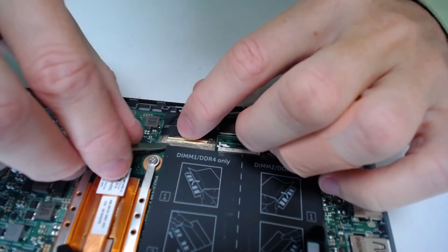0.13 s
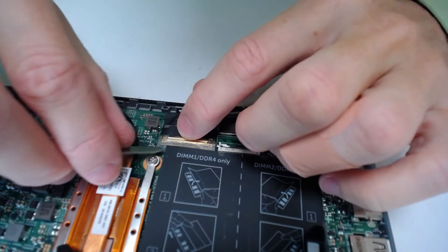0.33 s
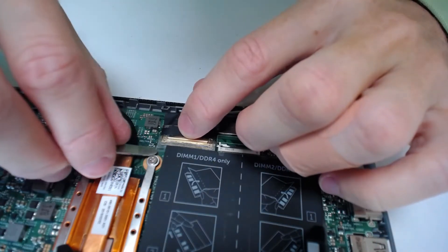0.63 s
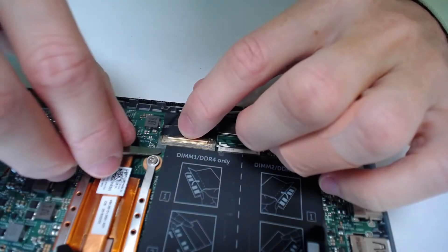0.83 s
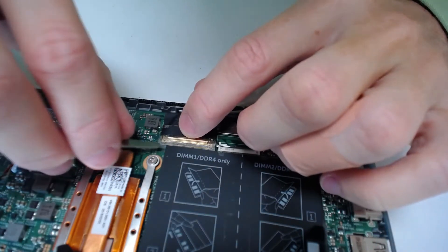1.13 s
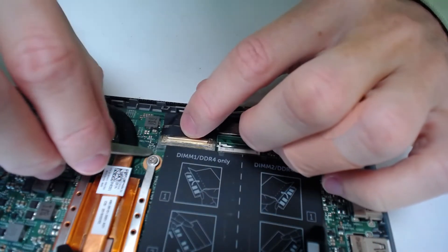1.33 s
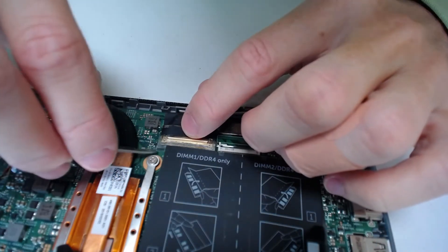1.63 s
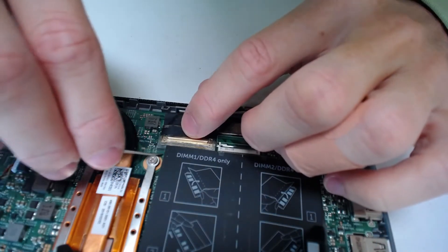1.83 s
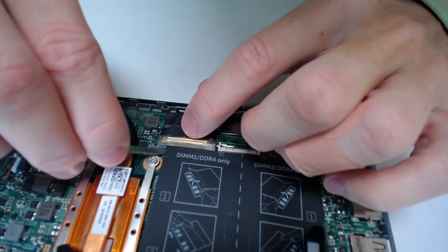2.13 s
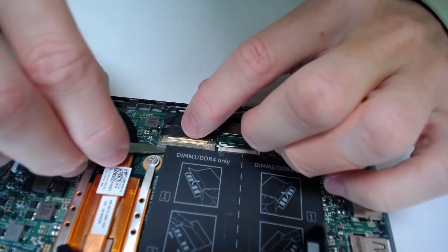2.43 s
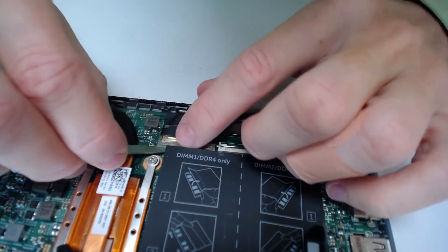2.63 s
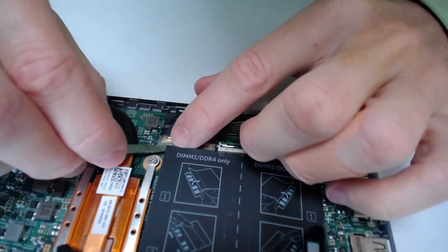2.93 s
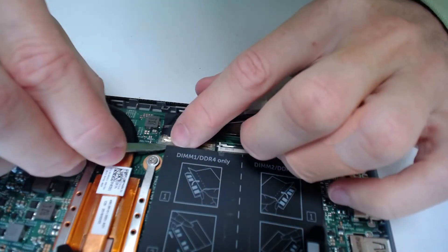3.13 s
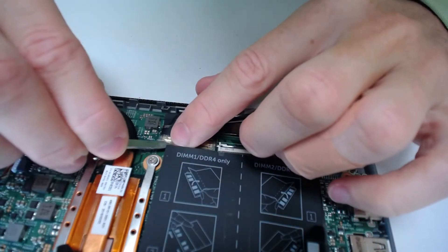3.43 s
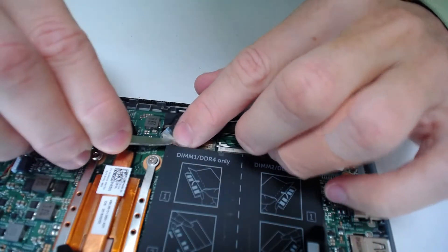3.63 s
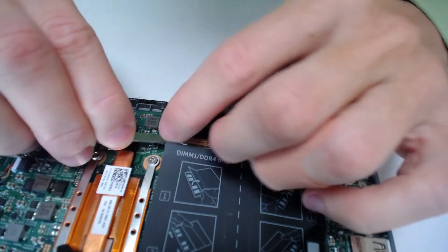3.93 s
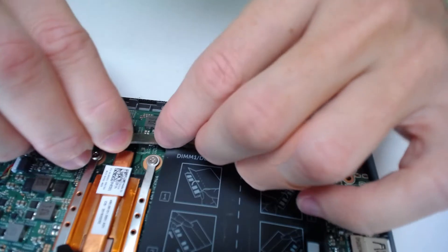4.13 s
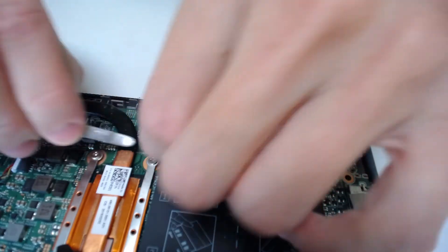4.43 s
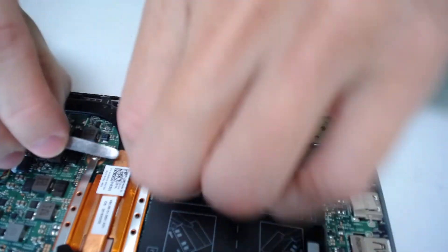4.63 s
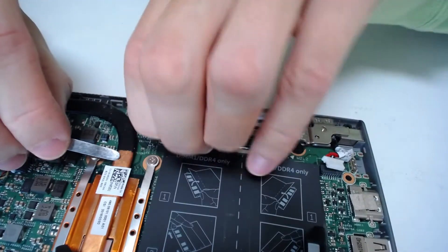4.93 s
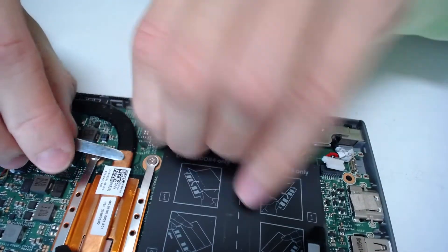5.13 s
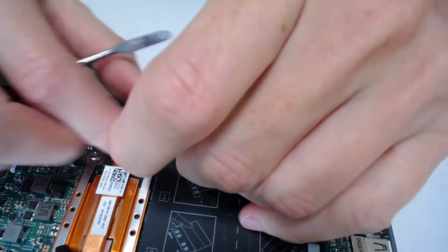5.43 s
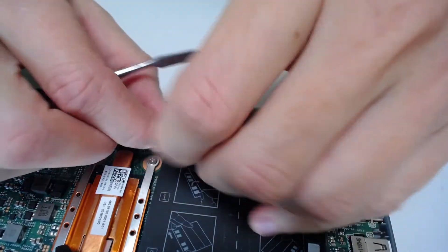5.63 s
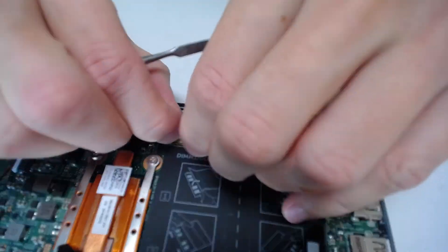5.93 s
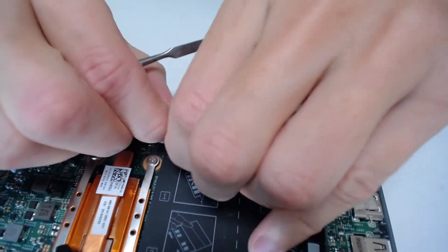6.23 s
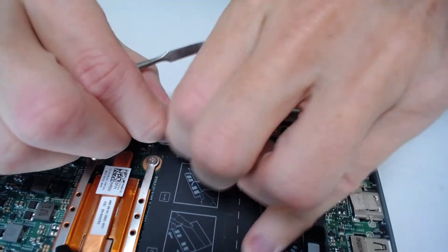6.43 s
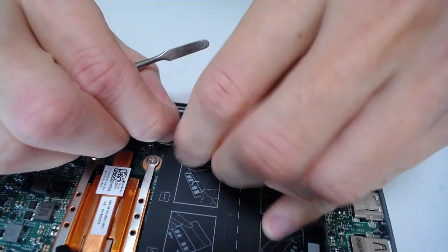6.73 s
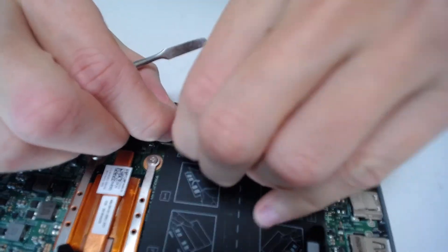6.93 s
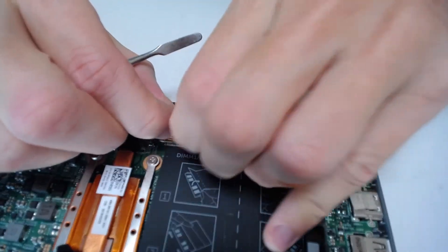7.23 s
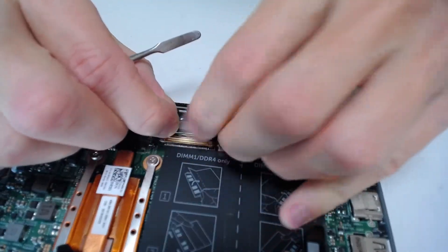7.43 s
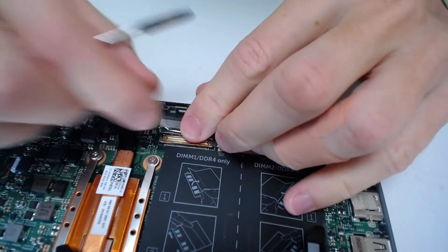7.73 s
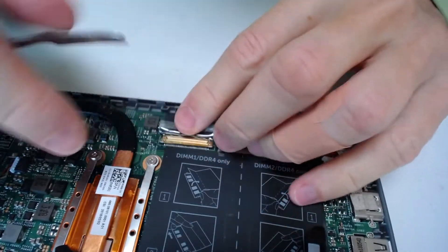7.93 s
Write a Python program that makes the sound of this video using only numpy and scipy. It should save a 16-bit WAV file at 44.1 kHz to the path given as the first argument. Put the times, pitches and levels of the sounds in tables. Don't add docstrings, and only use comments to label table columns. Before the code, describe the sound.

Throughout, a distant motor hums low and steady with a slight sway, beneath soft draught rumble and thin microphone hiss. Close up, fingers brush a circuit board: barely audible rubs and a faint tap by 0.9 s, a double light tick at 1.3, a soft knock at 2.1, a small crackle at 2.6. At 3.5 a steel blade slips with a crisp click, followed by ticks and peeling tape to about 4. Crackles return at 4.7-4.8, then a cluster at 5.1 with a dull, ringing bump. Rustles and squeaky rubs continue, with clicks near 6.05 and 6.2. From 6.3 to 6.65 knocks and scrapes crowd together, with tape letting go hard at 6.6. At 7.05 a ribbon cable snaps, brightest and loudest, its short tail dying in a small hard room; a tap follows at 7.13. Tiny foil ticks come at 7.5-7.6, then faint handling until 8.1.

```python
import sys
import numpy as np
from scipy import signal
from scipy.fft import rfft, irfft, next_fast_len
from scipy.io import wavfile
from scipy.ndimage import uniform_filter1d

SR = 44100
rng = np.random.default_rng(int(sys.argv[2]) if len(sys.argv) > 2 else 0)


def generate_wav(sig):
    pcm = np.round(np.clip(np.atleast_2d(sig).T, -1, 1) * 32767).astype(np.int16)
    wavfile.write(sys.argv[1], SR, pcm)


def ratio_of_db(decibels):
    return 10 ** (np.asarray(decibels, float) / 20)


N = 356724

# f/Hz, width/Hz
BOARD = [(2250, 460), (4150, 850), (6600, 1600), (9000, 2000), (12500, 3000)]


def band(x, hz, width):
    b, a = signal.iirpeak(hz, hz / (1.296 * width), SR)
    return signal.lfilter(b, a, signal.lfilter(b, a, x))


def unit(x):
    return x / np.sqrt(np.mean(x ** 2))


def along(table, hz):
    points, value = np.transpose(table)
    return np.interp(np.log(hz + 1e-9), np.log(points), value)


def course(table, **ends):
    return np.interp(np.arange(N) / SR, *np.transpose(table), **ends)


def walk(rate):
    hold = int(SR / rate)
    steps = np.repeat(rng.standard_normal(N // hold + 1), hold)
    slewed = uniform_filter1d(uniform_filter1d(steps, hold), hold)
    return unit(slewed[:N])


def spread(mid, side):
    return np.array([mid + side, mid - side])


def add(out, x, s):
    part = out[int(s * SR):][:len(x)]
    part += x[:len(part)]


def steady_noise(colour, db, side_db):
    size = next_fast_len(N)
    hz = np.fft.rfftfreq(size, 1 / SR)
    mid, side = rfft(rng.standard_normal((2, size))) * ratio_of_db(along(colour, hz))
    mid, side = irfft([mid, side * ratio_of_db(along(side_db, hz))], size)[:, :N]
    return ratio_of_db(db) / mid.std() * spread(mid, side)


def hiss():
    # f/Hz, level/dB per Hz
    hiss_colour = [(1060, -31), (1800, -1), (2260, -3), (2460, -5), (2950, -5), (3950, -8), (6180, -10.5),
                   (9330, -8.5), (10600, -11.5), (15600, -12), (15750, -40)]
    # f/Hz, side minus mid/dB
    hiss_side = [(2000, 3), (6000, 0.5), (9000, -9), (15000, -11)]
    return steady_noise(hiss_colour, -84, hiss_side)


def draught():
    # f/Hz, level/dB per Hz
    air_colour = [(11, -38), (18, -8), (59, -2.5), (164, -13.5), (266, -11), (326, -10), (449, -16.5),
                  (584, -19.5), (789, -19.5), (855, -24), (945, -24.5), (1250, -28), (1410, -23.5),
                  (1560, -31), (2200, -54.5), (2860, -77), (4840, -120)]
    # f/Hz, side minus mid/dB
    air_side = [(25, -28), (60, -19), (110, -16.5), (250, -16.5), (700, -7), (1300, -0.5), (2200, -1)]
    # t/s, level/dB
    strength = [(0, -1), (1.2, -1), (2.5, -.8), (3.4, .3), (4.2, 1.5), (5.5, .8), (6.6, .3), (8.09, 0)]
    gusts = course(strength) + .6 * walk(0.98)
    return steady_noise(air_colour, -66.5, air_side) * ratio_of_db(gusts)


def hum():
    # f/Hz, level/dB
    lines = [(59.2, -72), (118.4, -90), (172.3, -82.5), (204.6, -77), (231.5, -80), (274.5, -83),
             (323.0, -65), (398.4, -80), (500.6, -86.5), (667.5, -87), (786.0, -88.5), (942.1, -87),
             (1163, -92), (1378, -88.5), (1437, -91.5), (1453, -89)]
    # f/Hz, side minus mid/dB
    line_side = [(59, -24.5), (330, -24.5), (800, -13), (1450, -4)]
    # f/Hz, level/dB
    mains = [(120.3, -71.5), (120.54, -77.5)]
    t, out = np.arange(N) / SR, 0
    sway = np.cumsum(walk(1.501)) / SR
    for hz, db in lines:
        phase = 2 * np.pi * (hz * (t + 0.001505 * sway) + rng.random())
        tone = np.sqrt(2) * ratio_of_db(db) * (1 + .08 * walk(5)) * np.sin(phase)
        quarter_late = np.roll(tone, int(SR / hz / 4))
        out = out + spread(tone, ratio_of_db(along(line_side, hz)) * quarter_late)
    for hz, db in mains:
        phase = 2 * np.pi * hz * (t - 6.2)
        out = out + np.sqrt(2) * ratio_of_db(db) * spread(np.cos(phase), .15 * np.sin(phase))
    return out


def room(sharp, soft):
    # delay/s, level/dB, share to the left (-1..1)
    echoes = [(.0032, -19, -.3), (.0052, -20.5, 1), (0.0105, -31, -.5), (0.0219, -34, 0.64)]
    # f/Hz, T60/s
    decay = [(350, .45), (1500, 0.55), (4000, 0.74), (8000, 0.5), (13000, .25)]
    # f/Hz, level/dB
    tail_level = [(350, -14.5), (1000, -14.5), (2000, -21.5), (4000, -24.5), (7000, -23.5), (13000, -33)]
    # t/s, left minus right/dB
    place = [(0, 0), (1.3, 0), (3.47, -1), (4.5, 0), (5.1, -.7), (6.35, -1.2), (6.6, 0), (7.05, .3),
             (8.09, -.3)]
    x = sharp + soft
    side = 0.15 * (np.roll(x, 1) - np.roll(x, -1))
    side += .48 * band(x, 1250, 500) + .2 * band(x, 2300, 900) - .2 * band(x, 4500, 1500)
    lean = course(place) / 2
    out = spread(x, side) * ratio_of_db(np.array([lean, -lean]))
    for delay, db, left in echoes:
        out += ratio_of_db(db) * np.outer([1 + left, 1 - left], np.roll(sharp, int(delay * SR)))
    for hz in 400 * 2 ** np.arange(0, 5.3, 2 / 3):
        keep = ratio_of_db(-120 / along(decay, hz) / SR)
        late = np.roll(band(x, hz, .5 * hz), 260)
        energy = signal.lfilter([1 - keep], [1, -keep], late ** 2)
        envelope = np.sqrt(uniform_filter1d(energy, 132).clip(0))
        mid, side = unit(band(rng.standard_normal((2, N)), hz, .5 * hz))
        out += ratio_of_db(along(tail_level, hz) + 1.5 * walk(22)) * envelope * spread(mid, .8 * side)
    return out


def touches(*groups):
    centre = np.array(BOARD)[:, 0]
    rows = []
    for (pivot_hz, colour), events in groups:
        for s, span, db, tilt in events:
            rows.append((s, span, *(db + colour + tilt * np.log2(centre / pivot_hz))))
    return rows


def stroke(grains, s, length, hz, width, db):
    rise, fall = 0.0022 + 0.15 * length, .003 + 0.33 * length
    t = np.arange(int((length + rise + fall / 2) * SR)) / SR
    start = max(int((s - rise) * SR), 0)
    ring = band(grains[start:][:len(t)], hz, width)
    shape = np.clip(np.minimum(t / rise / 2, (t[-1] - t) / fall), 0, 1)
    return ratio_of_db(db) * shape[:len(ring)] * unit(ring), start / SR


def scuffs():
    skin_touch = 2340, (-0.5, -2.5, -9.5, -14, -33)
    tape_touch = 6300, (-5.5, -2, 0.5, -4, -25)
    # t/s, length/s, level/dB, tilt/dB per octave
    rubs = [(.02, 0.11, -87, -2.5), (.251, .094, -84, -1), (.51, .05, -90, 0), (.74, .076, -84, 1),
            (0.863, .035, -81, 0), (.93, .06, -87, -3), (1.312, .046, -69, -4), (2.073, 0.034, -75.5, -4),
            (4.392, 0.18, -82, 0), (4.935, .051, -78.5, 1), (5.319, .022, -79, 1), (5.43, .05, -76, 4),
            (5.481, 0.028, -64.5, 2), (5.901, 0.058, -75, 1.5), (5.97, 0.072, -76, 0),
            (6.3, .03, -69.5, 3.5), (6.34, .017, -70.5, 5), (6.369, .032, -59, -1),
            (6.401, .011, -53.5, -0.5), (6.414, 0.021, -62, 1.5), (6.51, .0084, -66, -4),
            (6.522, 0.026, -48, -7.5), (6.546, .014, -50.5, 0), (6.56, 0.045, -63.5, 0.5),
            (6.604, 0.012, -46.5, -1), (6.618, .011, -49, 1), (6.623, 0.072, -58.5, 1),
            (6.695, 0.056, -64, 2), (6.75, 0.066, -79, -1.5), (6.82, .078, -76, 3)]
    # t/s, length/s, level/dB, tilt/dB per octave
    peels = [(2.521, 0.068, -86.5, -3.5), (2.583, .088, -89, -3), (3.668, 0.075, -82, 0),
             (3.767, 0.09, -77, -2.5), (3.873, .21, -86, -4), (4.028, 0.17, -82, 2), (4.2, .06, -80, 3),
             (4.28, .11, -83, 2), (4.643, 0.059, -82, -4), (4.727, .031, -71, 2), (4.785, .023, -78, 2),
             (4.835, .077, -83, -5), (5.078, 0.06, -65, 0), (5.142, .067, -77.5, -4.5),
             (5.22, .064, -88, -4), (5.33, 0.021, -70.5, 6), (5.522, 0.03, -66.5, 1),
             (5.587, 0.042, -76, 0), (5.63, 0.043, -65.5, 2), (5.68, 0.054, -78.5, -2),
             (5.789, 0.061, -80.5, -3), (6.056, .11, -70.5, 4), (6.206, .037, -72.5, 2),
             (6.273, .017, -65, -5.5), (6.435, 0.044, -79, -1), (6.927, 0.12, -82.5, 0),
             (7.492, 0.013, -63, -4), (7.507, .03, -76, 3), (7.557, 0.038, -70, -1), (7.617, 0.02, -67, -1),
             (7.65, .1, -85, 0), (7.791, 0.05, -79.5, -1), (7.935, 0.077, -74.5, 1)]
    # t/s, length/s, f/Hz, level/dB
    squeaks = [(.05, .06, 2600, -87), (.261, 0.098, 4130, -76.5), (.28, .06, 2900, -81),
               (1.312, 0.046, 2300, -69), (2.08, .027, 2270, -69), (3.78, 0.075, 6350, -75),
               (4.94, .045, 4600, -77), (5.143, .11, 2760, -80), (5.32, 0.034, 4620, -73),
               (5.48, .03, 2200, -70), (5.51, .07, 4400, -73), (5.59, 0.09, 6200, -67.5),
               (5.7, .03, 6300, -75), (6.057, .12, 6270, -69), (6.63, .16, 1925, -66),
               (6.83, 0.073, 2320, -75.5), (6.94, 0.058, 6640, -80), (7.562, 0.05, 7500, -69),
               (7.62, .035, 7800, -69), (7.618, .02, 2200, -68), (0, 3.3, 9400, -100),
               (7.565, .03, 4300, -74), (7.975, 0.034, 2300, -74)]
    # t/s, length/s, f/Hz, level/dB
    swishes = [(8.03, 0.047, 6000, -79), (4.93, .06, 6000, -82), (5.14, .02, 9000, -75),
               (5.17, .04, 4900, -78), (5.705, .02, 11000, -82), (1.312, 0.049, 5000, -71),
               (3.485, .1, 5000, -76), (7.56, .055, 8000, -68), (6.68, .055, 9300, -67),
               (3.495, .13, 8400, -76), (5.33, .015, 11000, -70), (6.622, .06, 8800, -60)]
    # t/s, length/s, f/Hz, level/dB
    drags = [
        (5.099, .025, 1100, -65.5),
        (6.28, 0.18, 700, -75),
        (6.3, 0.22, 550, -76),
        (6.38, .14, 40, -65.5),
        (7.5, 0.15, 550, -75),
        (7.054, .03, 130, -66),
        (7.085, .012, 280, -62),
    ]
    # t/s, level/dB
    hands = [(3.3, -85), (3.46, -84), (3.62, -80), (4.07, -76), (4.51, -81.5), (4.83, -78.5), (5.42, -80),
             (5.57, -75), (5.93, -76), (6.13, -72.5), (6.26, -76), (6.37, -73), (6.53, -65), (6.65, -70),
             (6.87, -75.5), (7.25, -72), (7.74, -77), (8.09, -78)]
    out, fits = np.zeros(N), ratio_of_db(2.6 * walk(130))
    grains = []
    for mode in BOARD:
        size_db = 2.5 * rng.exponential(size=N) + 1.4 * walk(40)
        grains.append(rng.standard_normal(N) * ratio_of_db(size_db) * fits)
    rows = touches((skin_touch, np.array(rubs)), (tape_touch, np.array(peels)))
    spots = 1 + 0.032 * rng.standard_normal((len(rows), len(BOARD)))
    for (s, length, *db), spot in zip(rows, spots):
        for (hz, width), d, k, grain in zip(BOARD, db, spot, grains):
            add(out, *stroke(grain, s, length, hz * k, width * (.9 + 4.6 * length), d))
    steady = rng.standard_normal(N) * ratio_of_db(1.2 * walk(60))
    for wide, slides in (.065, squeaks), (.23, swishes), (.58, drags):
        for s, length, hz, db in slides:
            add(out, *stroke(steady, s, length, hz, wide * hz, db))
    skin = unit(band(grains[1][::-1], 2600, 1820)) + 0.74 * unit(band(grains[2][::-1], 6000, 4500))
    return out + ratio_of_db(course(hands, left=-120) - 6.5 + 1.4 * walk(8)) * skin


def contact(ms, modes, slips, crack=0.):
    n = np.arange(len(slips))
    t = n / SR * 1000 / max(ms, .1)
    scatter = np.minimum(t, 1) * ratio_of_db(-16 - 60 * n / SR / 0.023)
    push = t * np.exp(1 - 1.61 * t) + scatter
    first = crack * np.linalg.norm(push) * (n == int(ms * SR / 2000))
    out = 0
    for k, (hz, width, db) in enumerate(modes):
        ring = band(push * np.roll(slips, 97 * k) + (-1) ** k * first, hz, width)
        out = out + ratio_of_db(db) * ring / np.abs(ring).max()
    return out


def ticks():
    knock_touch = 2400, (-0.5, -7, -14.5, -26, -36)
    blade_touch = 4040, (-12.5, 0, -13, -19, -30)
    crackle_touch = 6600, (-14.5, -5, 1, -4.5, -19)
    # t/s, contact/ms, peak level/dB, tilt/dB per octave
    knocks = [(6.273, 1.2, -52, 3), (6.512, 1.2, -55, 0), (6.5212, 1.5, -42, -6), (6.535, 1.5, -40, -4),
              (6.55, 2, -39, -6), (6.606, 1.5, -41, -2), (6.6122, 1.8, -31, -3), (5.068, 1.5, -62, 4),
              (1.719, 2.4, -67.5, -10), (2.087, 2.4, -52, -3.5), (2.395, 1.1, -69, 8),
              (5.712, 1.1, -61, 10), (5.938, 2.8, -48, -1.5), (6.4065, 1.6, -37.5, 3),
              (6.4115, 2.4, -38, -6), (6.5255, 2.2, -35, -8), (6.5415, 2.2, -41, 7), (6.597, 1, -50, 5),
              (6.637, 1, -42, 2), (7.39, 1.5, -59.5, 5), (7.99, 2.1, -54, 1)]
    # t/s, contact/ms, peak level/dB, tilt/dB per octave
    catches = [(0.635, 2.8, -63.5, -9), (1.331, 1, -55, 0), (6.308, 1, -55, 0), (6.35, 1, -57, -3),
               (6.4005, 1.2, -46, -4), (3.493, 1.2, -56, 0), (2.61, 1.2, -65, -3), (3.451, 2.5, -60.5, 12),
               (3.666, 0.76, -46, 10.5), (3.7, 1.5, -63, 4), (3.725, 1, -69, 8), (6.2966, 1.2, -42.5, 5),
               (6.326, .6, -61, 12), (6.335, 1.3, -39.5, 0), (6.3677, 1, -45, -3), (6.381, 1.7, -42.5, -7),
               (6.985, 1, -64, 1)]
    # t/s, contact/ms, peak level/dB, tilt/dB per octave
    crackles = [(2.578, .83, -56, -2), (2.655, 1, -76, -7), (3.366, 1, -72, 4), (3.387, 1, -73, 2),
                (3.423, 1, -72, 0), (3.831, 1.2, -47, -3), (3.9367, 1.2, -54, -2), (4.718, 1.1, -68, 0),
                (4.728, 1, -47, 11), (4.738, 1, -54, -1), (4.7796, 1.1, -41.5, -2), (4.789, 1, -58, 2),
                (4.827, 1.2, -58, 5), (5.0748, .88, -46, -2), (5.093, 1.4, -41, 1.5), (5.2535, 1.1, -64, 3),
                (6.051, 2.7, -41.5, -2.5), (6.204, 0.85, -41.5, -4.5), (6.2778, 1.3, -45, -8),
                (7.046, 1.5, -65, 2), (7.327, 1.6, -67, 14), (7.632, 1, -49, 0), (7.4915, 1, -56, -3),
                (5.705, 1, -63, 0), (7.797, 1.3, -62, 13), (7.856, .8, -71, 14)]
    # (f/Hz, width/Hz, level/dB)
    taps = [
        ((.8605, 2, -60), [(2300, 250, -2), (3300, 800, 0), (4900, 900, 0), (7000, 1200, -14)]),
        ((1.3083, 1.6, -43), [(2170, 220, 0), (3550, 200, -7), (4420, 300, -1), (5200, 400, -7), (6300, 900, -16)]),
        ((1.3212, 2.2, -42), [(2300, 190, 0), (3850, 400, -5), (4570, 300, -7), (5800, 900, -9), (8600, 500, -26)]),
        ((5.0972, 1.6, -41), [(1500, 500, -20), (2700, 600, -12), (4400, 600, -2), (6100, 700, 0), (9000, 2000, -8)]),
        ((7.1286, 1, -32), [(2300, 700, -2), (4000, 900, 0), (6600, 1500, -14), (9000, 2000, -20)]),
        ((7.4975, 2.2, -44), [(1940, 300, -11), (4100, 260, 0), (5610, 300, -9), (7200, 900, -10), (10300, 1200, -22)]),
        ((7.5578, 1.4, -41), [(2200, 300, -19), (4060, 300, -14), (6880, 500, 0), (8400, 900, -6), (11300, 1500, -14)]),
        ((7.6145, 1.3, -40), [(2230, 300, -4), (3750, 350, -4), (5190, 300, -16), (7300, 700, -2), (8190, 600, 0), (11000, 2000, -14)]),
    ]
    # (f/Hz, width/Hz, level/dB)
    blade_slips = (3.4722, .6, -27), [(900, 400, -33), (1700, 400, -24), (2400, 800, -8), (4330, 900, 0),
                   (5730, 900, -11), (7100, 840, -4), (9100, 1400, -4.5), (11000, 850, -11),
                   (13800, 3500, -11)]
    bump = (5.1228, 7, -41), [(641, 150, -15), (2090, 250, -17), (2714, 130, -1), (3355, 110, -11),
            (4340, 200, -7), (6720, 250, -13)]
    tape_lets_go = (6.6146, .9, -20.5), [(1334, 180, -30), (1950, 520, -1), (2600, 400, -12),
                    (3700, 510, -10), (4460, 400, -14), (6750, 1200, -17), (8750, 1800, -14),
                    (13000, 4000, -24)]
    cable_snap = (7.0539, 0.43, -9), [(400, 170, -33), (606, 170, -26), (998, 110, -31), (1334, 120, -28),
                  (1700, 250, -34), (2250, 600, -5), (3020, 200, -20), (3796, 490, -1), (4496, 550, -10),
                  (5450, 450, -14), (6530, 850, -2), (8620, 700, -12), (10220, 1000, -13),
                  (12400, 2500, -14)]
    out = np.zeros(N)
    rows = touches((knock_touch, np.array(knocks)), (blade_touch, np.array(catches)),
                   (crackle_touch, np.array(crackles)))
    for s, ms, *db in rows:
        slips = rng.standard_normal(1024)
        spot = 1 + .02 * slips[-5:]
        modes = [(hz * k, width, d) for (hz, width), d, k in zip(BOARD, db, spot)]
        add(out, contact(0.67 * ms, modes, slips), s)
    strong = [(blade_slips, 1.1), (bump, .25), (tape_lets_go, 1.5), (cable_snap, 1.4)]
    for ((s, ms, db), modes), crack in strong + [(tap, .75) for tap in taps]:
        add(out, ratio_of_db(db) * contact(ms, modes, rng.standard_normal(2048), crack), s)
    return out


def scene():
    port = signal.butter(2, 13300, fs=SR, output="sos")
    sharp, soft = signal.sosfilt(port, [ticks(), scuffs()])
    return room(sharp, soft) + hum() + draught() + hiss()


def low_pass(x):
    return signal.sosfilt(signal.butter(12, 16300, fs=SR, output="sos"), x)


def record(dry):
    return low_pass(dry)


dry = scene()
out = record(dry)
generate_wav(out)
```